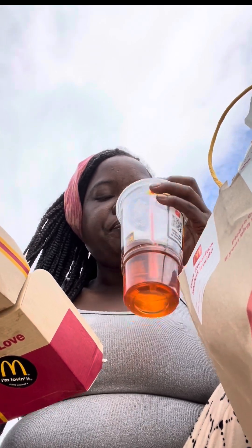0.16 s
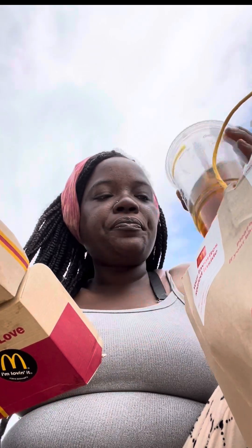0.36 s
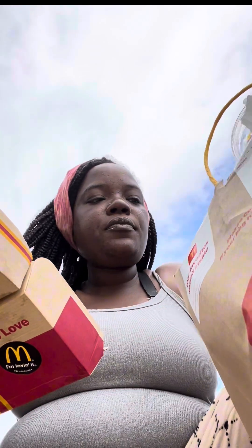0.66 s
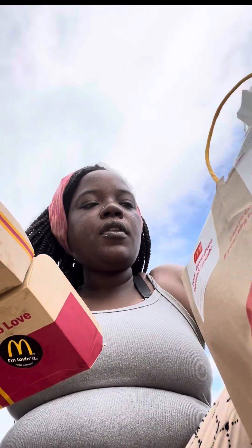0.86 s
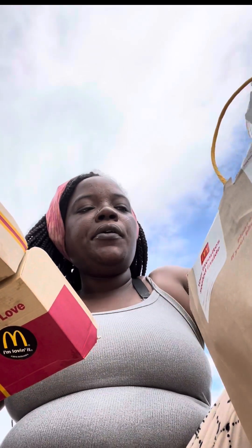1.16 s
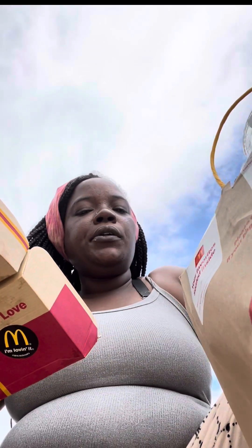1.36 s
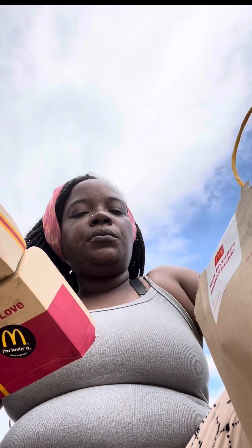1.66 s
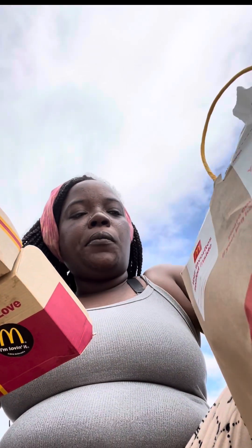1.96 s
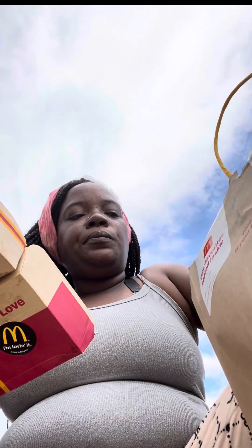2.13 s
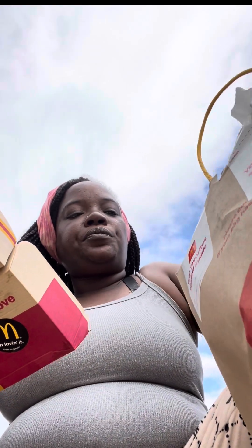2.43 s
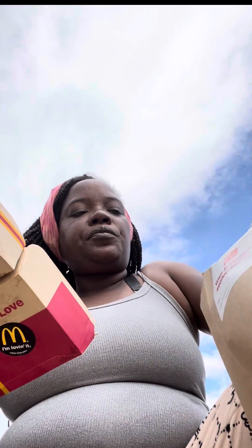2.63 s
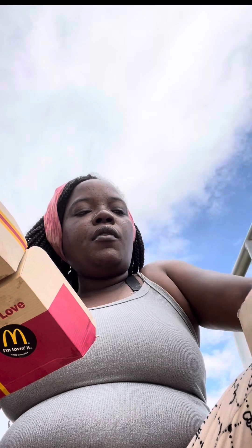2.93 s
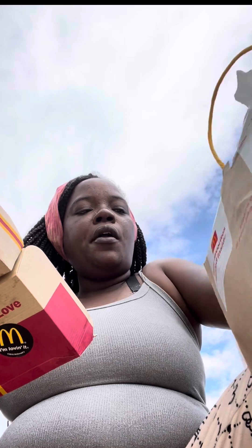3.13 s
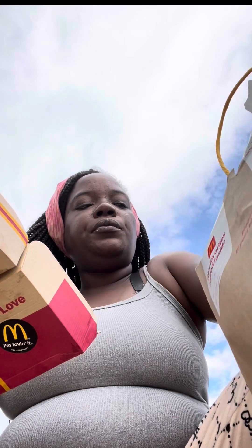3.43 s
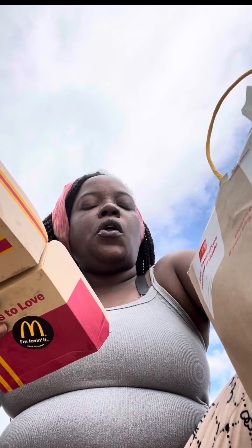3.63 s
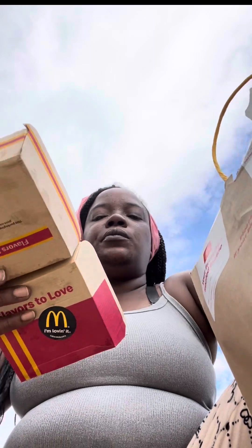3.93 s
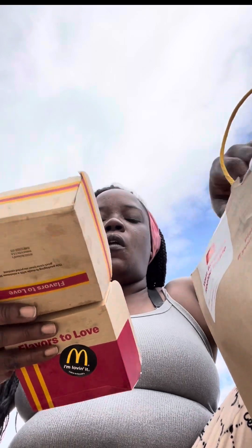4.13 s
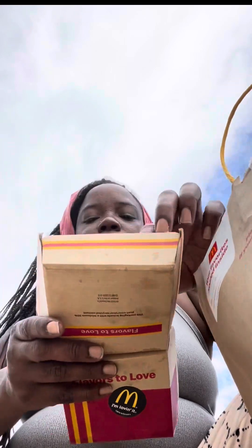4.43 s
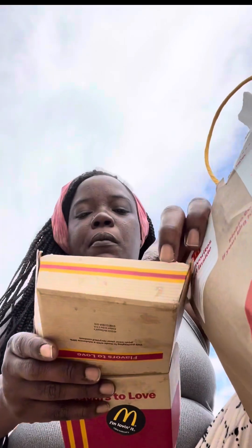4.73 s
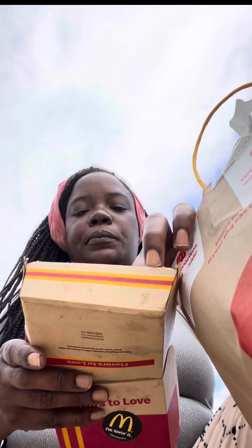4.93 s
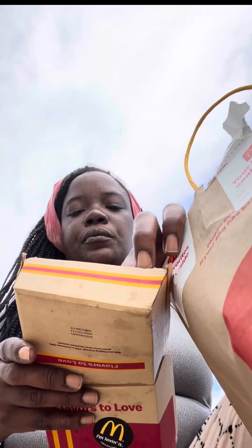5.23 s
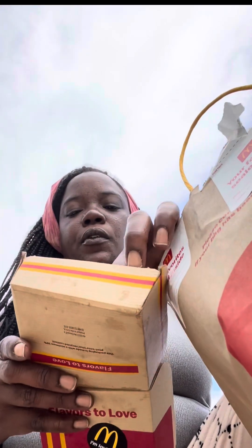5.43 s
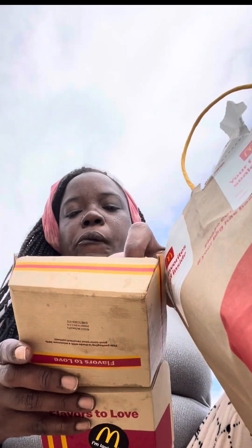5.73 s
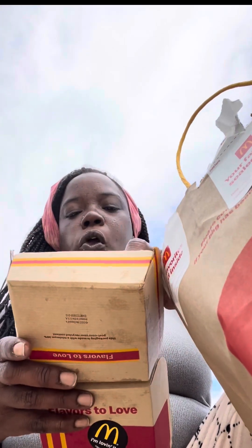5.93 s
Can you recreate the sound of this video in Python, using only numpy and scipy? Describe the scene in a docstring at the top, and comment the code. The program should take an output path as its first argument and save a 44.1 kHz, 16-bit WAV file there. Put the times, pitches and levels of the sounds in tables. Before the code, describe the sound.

Paper bag and thin cardboard box handled right beside the microphone, sharp snaps, crackles and dull thuds over low rumble and faint outdoor air.

```python
"""Paper bag and cardboard box beside a phone

Outdoors, paper and card buckle in sharp snaps: noise bursts drive resonances of air, panels and creases.
Decaying tones make panel rings and hard cracks; filtered pushes make taps; noise makes ticks, scrapes, rustle
and hiss. The phone itself gets thuds (swelling low sines), rumble (banded noise) and rocking (one low
resonance). An engine, a sum of crank harmonics, wavers, slows and fades in the first second over a faint noise
hush."""
import sys
import numpy as np
from scipy import signal
from scipy.io import wavfile
from scipy.ndimage import uniform_filter1d

SR = 44100
rng = np.random.default_rng(int(sys.argv[2]) if len(sys.argv) > 2 else 0)


def unload_audio(sound):
    """Save the sound as a 16-bit wav file, at the path given as the first command line argument."""
    columns = np.transpose(np.atleast_2d(sound))
    # keep every value between -1 and 1, then stretch to whole-number steps
    steps = np.round(np.clip(columns, -1, 1) * 32767)
    wavfile.write(sys.argv[1], SR, steps.astype(np.int16))


N = 268128
TIME = np.arange(N) / SR
CUTOFF_HZ = 15900

# Buckles of paper and card. Each row: start in seconds, relative strength in dB, sharpness in dB,
# decay time in seconds, panel pitch in Hz, crease pitch in Hz, ring in dB (half of it goes to the level),
# left over right in dB.
BUCKLES = [(0.698, -32, -20, 0.034, 534, 1680, -13, -9), (0.856, -28.5, -16, 0.057, 920, 1830, -5.5, -4),
           (1.599, -31.5, -7.5, 0.037, 498, 1750, -17, -5), (1.727, -27.5, 9.5, 0.009, 455, 2940, -3, 0),
           (1.733, -29.5, -12, 0.016, 680, 2260, -2, -9), (1.873, -33, -8, 0.0041, 473, 2720, -16, 2),
           (2.121, -30.5, 2, 0.017, 1180, 2620, 1, -6), (2.138, -27.5, -22, 0.0082, 566, 2690, -3, -5),
           (2.168, -21.5, 3, 0.0049, 1750, 2640, 2.5, 0), (2.178, -25, -1.5, 0.0026, 486, 2780, -19, -15),
           (2.197, -28.5, -15, 0.0068, 460, 2320, 6, -15), (2.2059, -20.5, 0.5, 0.0065, 960, 2450, -10, -9),
           (2.2132, -21, -6.5, 0.0063, 1040, 2800, -4, 2), (2.287, -45, 15.5, 0.025, 1030, 3260, 9, -3),
           (2.375, -21.5, -20.5, 0.006, 1080, 1680, -10, -6.5), (2.462, -31, 12, 0.015, 696, 2840, 1, -4),
           (2.488, -33, 9, 0.013, 2110, 2860, 11.5, 0), (2.502, -33.5, 9, 0.025, 1750, 2360, 12, -5),
           (2.5317, -32.5, 4, 0.006, 1370, 3200, -3, 2), (2.5467, -24, 1.5, 0.013, 586, 2820, -8, -4),
           (2.559, -34, 4, 0.0047, 594, 3170, 10, -2), (2.6624, -33.5, 13, 0.0068, 684, 2580, 3, -3),
           (2.68, -26, -7, 0.0041, 760, 2700, -12, -10), (2.709, -34.5, 4, 0.0058, 1400, 2360, -3, -10),
           (2.73, -25, -7, 0.011, 1410, 1520, -5, -7), (2.831, -31, -6, 0.0098, 493, 2640, 2, -6),
           (2.879, -29, 1.5, 0.0085, 540, 2320, 2, -4), (2.908, -28, -19, 0.019, 1160, 2730, -5, -8),
           (2.9342, -24, 1, 0.0021, 1110, 2780, 6.5, -3), (2.949, -21.5, -3, 0.0031, 1130, 2430, -9, 0),
           (2.977, -25, -10, 0.011, 920, 1690, -3.5, -11), (3.012, -24, 1, 0.015, 536, 2450, -10, -5),
           (3.0242, -21, -10, 0.0072, 680, 2700, -23, 3.5), (3.032, -23.5, -7, 0.016, 960, 1980, -0.5, -8),
           (3.098, -19.5, -4, 0.0082, 1045, 2740, -8, -5), (3.1063, -24.5, -15, 0.01, 530, 2750, -1, -2),
           (3.187, -29, -11, 0.016, 465, 1780, -4, -11), (3.449, -24, -13.5, 0.01, 850, 2650, -14, -8.5),
           (3.589, -30, 4, 0.065, 520, 2640, 1, -1), (3.633, -21, 2, 0.011, 1280, 3020, 0, -8),
           (3.821, -33.5, 14.5, 0.014, 2700, 2680, -13, 0),
           (4.037, -28.5, -15.5, 0.021, 840, 2450, -13, -9), (4.464, -34.5, -3, 0.019, 756, 1390, 5, 0),
           (4.541, -33.5, -8.5, 0.0036, 695, 2550, 6, 1), (4.602, -37.5, -8, 0.0048, 574, 1710, 10.5, 0),
           (4.696, -36, -15, 0.0045, 640, 1510, -1.5, 3), (4.948, -31.5, -23, 0.0027, 490, 2430, 4, 3),
           (4.997, -38, -27, 0.0058, 1150, 1720, 0, -7), (5.0655, -18.5, -0.5, 0.007, 1280, 2690, 1, -4),
           (5.162, -37, 6.5, 0.0049, 2780, 2800, -11, -3.5),
           (5.376, -36.5, -14, 0.0091, 810, 1630, -3.5, -4), (5.409, -44, 1, 0.0055, 870, 2580, 3, 0),
           (5.460, -32.5, 4.5, 0.011, 1230, 2210, 0, -1), (5.6253, -33.5, 2, 0.0042, 1280, 2400, 17, 5)]
# Rubbing and air on the phone. Each row: time in seconds, level in dB.
PHONE_RUBBING = [(0.0, -27.5), (0.25, -36.5), (0.93, -38), (1.79, -35.5), (2.56, -28.5), (3.0, -27.5),
                 (3.15, -25.5), (3.42, -28), (3.57, -25), (4.01, -27.5), (4.17, -29), (4.4, -32),
                 (4.5, -26.5), (4.67, -37), (5.57, -44.5), (6.08, -81)]


def from_db(db):
    """Level to amplitude: 20 dB is a factor of ten."""
    return 10 ** (np.asarray(db) / 20)


def rms_one(x):
    """Normalisation: scale to unit mean power."""
    return x / np.sqrt(np.mean(x ** 2) + 1e-20)


def in_time(rows):
    """Linear interpolation: each column of a curve at every sample."""
    seconds, *columns = np.transpose(rows)
    return [np.interp(TIME, seconds, column) for column in columns]


def at_hz(points, hz):
    """Pitch is logarithmic: interpolate a curve on a log-frequency axis."""
    curve_hz, values = np.transpose(points)
    return np.interp(np.log(hz), np.log(curve_hz), values)


def butter(x, hz, kind, order=2):
    """Causal Butterworth filter, flat within its passband."""
    return signal.sosfilt(signal.butter(order, hz, kind, fs=SR, output="sos"), x)


def peak(x, hz, width_hz):
    """A single resonance, with gain 1 at its centre."""
    return signal.lfilter(*signal.iirpeak(hz, hz / width_hz, fs=SR), x)


def drift(rate_hz):
    """Low-passed noise: a slow random wander of spread 1, computed at every 40th sample."""
    r = np.exp(-80 * np.pi * rate_hz / SR)
    noise = rng.standard_normal(N // 40 + 2002)
    slow = signal.lfilter([1], [1, -2 * r, r * r], noise)[2000:]  # skip the filter's start
    return np.interp(np.arange(N) / 40, np.arange(len(slow)), rms_one(slow))


def panned(pan_db):
    """Level difference between ports: left and right gains, positive towards the left."""
    return from_db(np.array([[.5], [-.5]]) * pan_db)


def pair(mid, side, alike):
    """Stereo correlation: two unrelated signals become a pair of given likeness."""
    return np.sqrt((1 + alike) / 2) * mid + np.sqrt((1 - alike) / 2) * side * np.array([[1], [-1]])


def resonate(x, modes, low_hz, high_hz, size=4096):
    """Modal filtering: parallel resonances, each with its own pan; white noise keeps its mid power."""
    click, response = signal.unit_impulse(size), 0
    for k, (hz, width_hz, db, pan_db) in enumerate(modes):
        r = np.exp(-np.pi * width_hz / SR)
        poles = [1, -2 * r * np.cos(2 * np.pi * hz / SR), r * r]
        mode = (1 - r * r) * signal.lfilter([1, 0, -1], poles, click)
        response = response + (-1) ** k * from_db(db) * panned(pan_db) * mode  # alternating signs
    response = butter(butter(response, low_hz, "high", order=3), high_hz, "low", order=5)
    return signal.oaconvolve(x, response / np.linalg.norm(response.mean(axis=0)), axes=1)[:, :N]


def packaging(hollow, sheet, crisp, hollow_width=0.44):
    """Coupled resonators: enclosed air booms, panels clack, creases tick; long waves reach both ports alike."""
    # Resonances of the air, the panels and the creases.
    # Each row: pitch in Hz, width in Hz, level in dB, left over right in dB.
    air_modes = [(267, 35.6, 4.5, 0.5), (455, 104, 3.5, -1.5), (750, 1400, -10, -10)]
    panel_modes = [(965, 203, 9, -2.5), (1083, 206, 7, -7.5), (1680, 830, -2.5, -3), (2290, 92, 5.5, 1.5),
                   (2780, 290, 2.5, 4.5), (3516, 1000, -7.5, 9)]
    crease_modes = [(4220, 490, -1.5, 0.87), (5650, 900, -3.5, 0.91), (6540, 570, -5, 0.9)]
    middle = hollow.mean(axis=0)
    hollow = middle + hollow_width * (hollow - middle)
    boom = resonate(hollow, air_modes, 190, 1165)
    clack = resonate(sheet, panel_modes, 1000, 4320)
    tick = resonate(crisp, crease_modes, 1200, 17000)
    return boom + clack + tick


def banded_noise(spectrum, top_hz, patchy_db):
    """Subband synthesis: half-octave noise bands, each with its own flicker and likeness; rms 1."""
    # Stereo likeness. Each row: frequency in Hz, left-right correlation.
    port_likeness = [(40, .998), (90, .995), (180, .98), (350, .8), (700, .5), (1500, .3), (5000, .3),
                     (12000, .8)]
    edges = 22 * 2 ** np.arange(0, 10, .5)
    out, white = 0, rng.standard_normal((2, 2, N))
    for k, (low, high) in enumerate(zip(edges, edges[1:])):
        if low < top_hz:
            hz = np.sqrt(low * high)
            band = pair(*butter(white[k % 2], [low, high], "band"), at_hz(port_likeness, hz))
            out = out + band * from_db(at_hz(spectrum, hz) + patchy_db * drift(16.6))
    return rms_one(out)


def facets(x, count=4):
    """Random resonance: every buckle bends other facets, which give it a colour of its own."""
    pitches = 700 * 2 ** (3 * (np.arange(count) + rng.random(count)) / count)
    return x + sum(peak(x, hz, hz / 12) for hz in pitches)


def snaps(hollow_db=-1, sheet_db=-3.0, crisp_db=-14, crease_width_hz=220, grain_db=7, rise_s=0.0005,
          tail_db=-14, hollow_tail_s=0.029, sheet_tail_s=0.013, crisp_tail_s=0.0065, size=6000):
    """Buckling: a crease yields in a quick run of tiny buckles and rings; hollow tails last longest."""
    hollow_loss, sheet_gain = 0.16, 0.55  # dB per dB of sharpness: sharp buckles boom less and crack more
    t = TIME[:size]
    tail_s = np.array([hollow_tail_s, sheet_tail_s, crisp_tail_s])[:, None, None]
    tails = from_db(tail_db) * np.exp(-t / tail_s)
    drive, creases = np.zeros((3, 2, N + size)), np.zeros((2, N + size))
    for s, db, sharp_db, decay_s, _, crease_hz, ring_db, pan_db in BUCKLES:
        hollow, sheet, crisp = db - hollow_loss * sharp_db, db + sheet_gain * sharp_db, db + sharp_db
        # each grain holds one random level for 24 samples
        steps = np.repeat(rng.standard_normal(size), 24)[:size].clip(-1.5, 1.5)
        fade = (np.exp(-(t / decay_s) ** 2) + tails) * (1 - np.exp(-t / rise_s))
        run = facets(pair(*rng.standard_normal((2, size)), .4) * from_db(grain_db * steps) * fade)
        run *= np.sqrt(.01 * SR / np.sum(run ** 2, axis=2, keepdims=True))  # equal energy
        burst = from_db([hollow + hollow_db, sheet + sheet_db, crisp + crisp_db])[:, None, None] * run
        ring = peak(run[2], crease_hz, crease_width_hz)
        ring *= np.sqrt(.002 * SR / np.sum(ring ** 2, axis=1, keepdims=True))
        at = int(s * SR)
        drive[:, :, at:at + size] += burst * panned(pan_db)
        creases[:, at:at + size] += from_db(sheet + ring_db / 2) * panned(pan_db) * ring
    return packaging(*drive[:, :, :N]) + creases[:, :N]


def panels(level_db=11, ring_s=0.0024, rise_s=0.00056, overtone=1.744, overtone_db=-9,
           port_lag_s=.00008, size=2500):
    """Free plate vibration: a flipped panel rings at a pitch set by its size; the right port hears it first."""
    ring_loss = 0.14  # dB per dB of sharpness
    ring_length_gain = 0.28  # a louder ring is also longer: dB of time per dB
    panel_pan_db = -2.5  # the flat panels face further right than the creases
    t = np.maximum(TIME[:size] - port_lag_s * np.array([[1], [0]]), 0)
    out = np.zeros((2, N + size))
    for s, db, sharp_db, _, hz, _, ring_db, pan_db in BUCKLES:
        phase = 2 * np.pi * hz * t
        ring = np.sin(phase) + from_db(overtone_db) * np.sin(overtone * phase)
        decay_s = ring_s * from_db(ring_length_gain * ring_db)
        fade = np.exp(-t / decay_s) * (1 - np.exp(-t / rise_s))
        gain = from_db(db - ring_loss * sharp_db + ring_db / 2 + level_db)
        at = int(s * SR)
        out[:, at:at + size] += gain * panned(pan_db + panel_pan_db) * ring * fade
    return out[:, :N]


def cracks(rise_s=0.00031, sag=0.021, pan_db=-2, port_lag_s=.00004, size=2500):
    """Snap-through: a stiff fold pops and rings at two pitches, which sag as the tension lets go."""
    # Each row: start in seconds, level of the lower tone in dB, lower pitch in Hz, upper pitch in Hz,
    # upper over lower tone in dB, decay time in seconds. The pitches are those after the sag.
    popped_folds = [(1.7278, -18, 3060, 3990, 6, 0.002), (2.1685, -23, 1720, 4900, -5, 0.0033),
                    (2.2065, -13, 1750, 4900, -15, .003), (2.7305, -17.5, 1390, 2320, -6, .003),
                    (2.9348, -24.5, 1150, 4140, 8, 0.0029), (2.9495, -16, 2370, 4300, -10, .003),
                    (3.635, -34, 2170, 2780, -3, 0.0036), (5.0662, -8.5, 1720, 3600, -6, 0.002),
                    (5.0675, -13.5, 2055, 2680, 5.5, 0.0028)]
    t = np.maximum(TIME[:size] - port_lag_s * np.array([[1], [0]]), 0)  # the right port hears it first
    out = np.zeros((2, N + size))
    for s, peak_db, lower_hz, upper_hz, upper_db, decay_s in popped_folds:
        fade = np.exp(-t / decay_s)
        turn = 2 * np.pi * (t + sag * decay_s * (1 - fade))
        ring = np.sin(lower_hz * turn) + from_db(upper_db) * np.sin(upper_hz * turn)
        at = int(s * SR)
        out[:, at:at + size] += from_db(peak_db) * ring * fade * (1 - np.exp(-t / rise_s))
    return panned(pan_db) * out[:, :N]


def bumps(low_hz=170, boom_hz=300, boom_width_hz=60, pan_db=-3, size=3000):
    """Impulse response: a fingertip gives the box wall one rounded push, and the air inside booms briefly."""
    # Each row: start in seconds, peak level before panning in dB, upper cutoff of the push in Hz.
    finger_taps = [(.44, -22, 330), (1.729, -41, 790), (1.743, -25, 600), (2.157, -21, 550),
                   (2.184, -14.5, 600), (2.198, -11, 540), (2.2141, -13, 676), (2.377, -20.5, 705),
                   (2.389, -19.5, 590), (2.682, -24, 600), (3.636, -5.5, 800), (4.038, -24, 1000),
                   (4.052, -16.5, 780), (4.148, -18, 450), (4.163, -21, 680), (4.245, -16.5, 750),
                   (4.267, -16.5, 550), (4.284, -19.5, 394), (4.952, -21.5, 1320), (5.066, -21, 814),
                   (5.078, -22, 720), (5.626, -25, 400), (5.642, -22, 450)]
    out = np.zeros(N + size)
    for s, peak_db, top_hz in finger_taps:
        push = butter(butter(signal.unit_impulse(size), top_hz, "low", order=4), low_hz, "high")
        knock = push + peak(push, boom_hz, boom_width_hz)
        at = int(s * SR)
        out[at:at + size] += from_db(peak_db) * knock / np.abs(knock).max()
    return panned(pan_db) * out[:N]


def ticks(level_db=-6, low_hz=5500, size=1500):
    """Small radiators favour short waves: the smallest creases click with treble only."""
    # Each row: start in seconds, relative level in dB.
    small_creases = [(1, -27.5), (2.0976, -30.5), (2.206, -22), (2.464, -28), (2.933, -15.5), (3.028, -28),
                     (3.594, -24), (3.825, -23), (4.4825, -27), (5.163, -34)]
    out = np.zeros((2, N + size))
    fade = np.exp(-TIME[:size] / .003)
    for s, peak_db in small_creases:
        at = int(s * SR)
        click = pair(*rng.standard_normal((2, size)), 0.096) * fade
        out[:, at:at + size] += from_db(peak_db + level_db) * click
    return butter(out[:, :N], low_hz, "high")


def scrape(slips_per_s=2500, grain_db=3):
    """Stick-slip friction: card fibres catch and slip so densely that the flap sounds one fine, unbroken rub."""
    # Card scraping along card. Each row: time in seconds, relative level in dB.
    scrape_curve = [(4.42, -74), (4.465, -41.5), (4.52, -45), (4.548, -35.5), (4.578, -35), (4.611, -48),
                    (4.679, -63)]
    # Resonances of the flap. Each row: pitch in Hz, width in Hz, level in dB, left over right in dB.
    flap_modes = [(680, 330, -0.5, 4), (1324, 330, 2, 1), (1720, 190, 1.5, -1), (2700, 1200, -13, -3)]
    slips = (rng.random(N) < slips_per_s / SR) * from_db(grain_db * rng.standard_normal(N))
    rub = rms_one(slips * rng.choice([-1, 1], N))
    s, db = np.transpose(scrape_curve)
    rub = rub * np.interp(TIME, s, from_db(db), left=0, right=0)
    return resonate(np.ones((2, 1)) * rub, flap_modes, 350, 5000)


def stroking():
    """Power addition: strokes swell, hold and die away above the stir of holding; rustle and hiss gains."""
    # A hand slides over the packaging. Each row: start in seconds, length in seconds,
    # relative rustle level in dB, relative fine hiss level in dB.
    hand_strokes = [(0.443, 0.078, -45.5, -72), (0.905, 0.082, -44, -59.5), (1.212, 0.1, -48.5, -69),
                    (1.427, 0.11, -43, -65.5), (1.652, 0.37, -48.5, -72.5), (2.063, 0.16, -39, -64.5),
                    (2.32, 0.038, -35.5, -71), (2.46, 0.14, -35.5, -57), (2.625, 0.13, -34, -58.5),
                    (2.799, 0.31, -37, -64.5), (3.136, 0.37, -47, -77), (3.55, 0.13, -36.5, -64),
                    (3.773, 0.11, -43.5, -71), (3.919, 0.05, -44.5, -63), (4.466, 0.11, -50, -64.5),
                    (5.45, 0.19, -49, -61), (5.486, 0.018, -39, -62), (5.595, 0.056, -39.5, -57),
                    (5.738, 0.28, -52, -68.5)]
    attack_s, release_s = 0.024, 0.045
    # the packaging stirs a little even when only held
    rustle_power, hiss_power = from_db(-51) ** 2, from_db(-96.5) ** 2
    for s, length_s, rustle_db, hiss_db in hand_strokes:
        swell = np.clip((TIME - s) / attack_s, 0, 1)
        shape = swell * np.exp(-np.maximum(TIME - s - length_s, 0) / release_s)
        rustle_power = rustle_power + (from_db(rustle_db) * shape) ** 2
        hiss_power = hiss_power + (from_db(hiss_db) * shape) ** 2
    return np.sqrt(rustle_power), np.sqrt(hiss_power)


def crinkles(level_db, per_s=380, grain_db=6, ring_periods=3.5, tilt_db=-9, count=18):
    """Clumped random impulses: small paper facets flip, each ringing a few cycles at one of 18 pitches."""
    born = rng.random(N) < per_s * from_db(5 * drift(20)) / SR
    strength = from_db(grain_db * np.minimum(rng.exponential(1, N), 2))
    flips = born * strength * pair(*rng.choice([-1, 1], (2, N)), 0.026)
    dealt, out = rng.integers(0, count, N), 0
    for k, hz in enumerate(np.geomspace(750, 5000, count)):
        r, w = np.exp(-hz / (ring_periods * SR)), 2 * np.pi * hz / SR
        gain = from_db(tilt_db * max(np.log2(hz / 2400), 0))  # the smallest facets radiate least
        poles = [1, -2 * r * np.cos(w), r * r]
        # the tiny offset keeps the filter state away from denormal numbers
        out = out + gain * signal.lfilter([0, np.sin(w)], poles, flips * (dealt == k) + 1e-18)
    return from_db(level_db) * rms_one(butter(out, [400, 6500], "band"))


def rustle(sliding, sheet_db=-6, hollow_db=-3, crisp_db=-14, crinkle_db=1, stick_db=2.0, pan_db=-3.0,
           quiet_db=-50):
    """Friction noise: sliding paper gives an uneven rub with small crinkles riding on it."""
    level_db = 20 * np.log10(sliding)
    # the air inside is stirred by the stroke or by rubbing on the phone, whichever is stronger
    body_db = np.maximum(level_db + 3, in_time(PHONE_RUBBING)[0] - 11)
    moving = panned(pan_db) / (1 + from_db(2 * (quiet_db - level_db)))  # barely moving paper is held back
    rub = pair(*rng.standard_normal((2, N)), 0.047) * from_db(stick_db * drift(130))
    rub = rms_one(rub) * moving
    hollow = rub * from_db(body_db + hollow_db)
    sheet = rub * from_db(level_db + sheet_db)
    crisp = rub * from_db(level_db + crisp_db)
    return packaging(hollow, sheet, crisp) + moving * crinkles(level_db + crinkle_db)


def swish(pressure, level_db=11, low_hz=2400, top_hz=6000):
    """Fine-scale friction: skin gliding on a smooth surface gives a grainy hiss."""
    grain = from_db(2 * drift(30) + 4 * drift(200))
    noise = pair(*rng.standard_normal((2, N)), 0.045) * grain
    hiss = rms_one(butter(noise, [low_hz, top_hz], "band", order=1))
    return hiss * pressure * from_db(level_db)


def nearby_echoes(x, level_db=-19, decay_s=0.01, dull_hz=1800, size=5000):
    """Diffuse reflection: short dull scatter from the body, the bag and the ground."""
    t = TIME[:size]
    scatter = butter(rng.standard_normal((2, size)), dull_hz, "low")
    scatter = scatter * np.exp(-t / decay_s) * (t > .003)
    scatter /= np.linalg.norm(scatter, axis=1, keepdims=True)
    return x + from_db(level_db) * signal.oaconvolve(x, scatter, axes=1)[:, :N]


def thuds(level_db=-2.5, rise_s=0.0089, overtone_db=-9, overtone=2.16, contact_db=-8, contact_hz=420):
    """Damped mass on a spring: a padded knock rocks the phone a few cycles; the contact adds a dull pat."""
    # Soft knocks that reach the phone. Each row: start in seconds, relative level in dB, pitch in Hz.
    soft_knocks = [(0.816, -15.5, 147), (0.821, -15.5, 77), (1.101, -24.5, 111.6), (1.15, -20.5, 74),
                   (1.876, -20, 74.3), (2.192, -10.5, 136), (2.212, -14, 64), (2.377, -17, 191),
                   (2.573, -17, 112), (2.682, -10, 102), (2.988, -14, 120), (3.025, -13.5, 190),
                   (3.41, -10.5, 56), (3.452, -11.5, 67), (3.643, -5.5, 83.5), (3.98, -8, 82.3),
                   (4.04, -10.5, 78.3), (4.108, -14, 81), (4.155, -14.5, 79), (4.234, -9, 108),
                   (4.263, -8, 66.6), (4.294, -9.5, 82.4), (4.481, -14.5, 80), (4.709, -20.5, 90),
                   (4.876, -21.5, 78), (4.954, -16, 76), (5.055, -18, 98), (5.625, -18, 98.2)]
    out, touches = np.zeros(N), np.zeros(N)
    for s, peak_db, hz in soft_knocks:
        at = int(s * SR)
        t = TIME[:min(N - at, SR // 5)]
        swell = t / rise_s * np.exp(1 - t / rise_s)
        upper = from_db(overtone_db) * swell * np.sin(2 * np.pi * overtone * hz * t)
        sway = np.sin(2 * np.pi * hz * t) + upper
        out[at:at + len(t)] += from_db(peak_db + level_db) * swell * sway
        touches[at:at + len(t)] += from_db(peak_db + contact_db) * swell ** 2 * rng.standard_normal(len(t))
    return out + butter(touches, [contact_hz / 2, contact_hz], "band")


def rumble():
    """Low-frequency random excitation: lumpy noise from rubbing and moving air."""
    # Each row: frequency in Hz, relative spectral density in dB per Hz.
    low_colour = [(15, -42), (25, -35), (47, -5), (86, 0), (113, -9.5), (163, 0), (200, -7), (264, -24),
                  (333, -24.5), (450, -25), (580, -54), (990, -120)]
    return from_db(in_time(PHONE_RUBBING)[0]) * banded_noise(low_colour, top_hz=450, patchy_db=3.0)


def rocking(level_db=-3, hz=86, width_hz=7, firm_db=-25, steepness=2.17):
    """Resonance under random force: firm rubbing sets the propped phone rocking at its own low pitch."""
    sway = rms_one(peak(rng.standard_normal(N), hz, width_hz))
    even = sway / np.sqrt(uniform_filter1d(sway ** 2, SR // 8) + .1)  # evens out the random swelling
    firmness_db = steepness * (in_time(PHONE_RUBBING)[0] - firm_db)
    return from_db(firm_db + level_db + firmness_db) * even


def engine(waver_db=0.8):
    """Harmonic synthesis: only low orders of the exhaust carry this far; the air makes each swell and fade."""
    # Each row: time in seconds, crank turns per second, level in dB.
    engine_run = [(0, 47, -44.5), (.12, 48.4, -36.5), (.3, 44.7, -34), (.45, 45.3, -37.5),
                  (.56, 41.3, -34.5), (.72, 42.5, -37.5), (.85, 46, -43), (1.0, 27, -60)]
    # Each row: multiple of the crank rate, relative level in dB.
    exhaust_orders = [(2, -7), (3, -3), (4, 3), (5, -9.5), (6, -28.5)]
    turns, level_db = in_time(engine_run)
    crank = 2 * np.pi * np.cumsum(turns) / SR
    tones = 0
    for order, db in exhaust_orders:
        fading_db = waver_db * drift(4)
        tones = tones + from_db(db + fading_db) * np.sin(order * crank + 2 * np.pi * rng.random())
    return np.sqrt(2) * from_db(level_db) * tones


def hush(level_db=-42, swell_db=1.5, edge_hz=3090, step_db=-5.5):
    """Coloured noise: faint outdoor air with gently swelling bright bands and a sharp drop above one pitch."""
    # Each row: frequency in Hz, relative spectral density in dB per Hz.
    air_colour = [(25, -7), (88, 2.5), (220, -5), (320, -9.5), (940, -13.5), (1800, -16), (2830, -16.5),
                  (3800, -29), (5450, -24), (7500, -63.5), (11000, -34.5), (16000, -79.5)]
    # Bright bands. Each row: pitch in Hz, width in Hz, gain in dB.
    bright_bands = [(1750, 550, -5), (2880, 130, -4)]
    air = banded_noise(air_colour, top_hz=CUTOFF_HZ, patchy_db=2.0)
    air = air + sum(from_db(db + swell_db * drift(2.3)) * peak(air, hz, width_hz)
                    for hz, width_hz, db in bright_bands)
    below, above = (signal.sosfilt(signal.ellip(7, .5, 50, edge_hz, kind, fs=SR, output="sos"), air)
                    for kind in ("low", "high"))
    return from_db(level_db) * (below + from_db(step_db) * above)


def scene():
    """Superposition: packaging close by, thuds and rumble on the phone, the outdoors behind."""
    sliding, gliding = stroking()
    buckling = snaps() + panels() + cracks()
    contacts = bumps() + ticks() + scrape()
    handling = buckling + contacts + rustle(sliding) + swish(gliding)
    on_phone = thuds() + rumble() + rocking()
    return nearby_echoes(handling) + on_phone + engine() + hush()


def record(dry, apart_db=7, apart_hz=9300, apart_q=3.8, side_top_hz=11000):
    """Mid-side filtering: near 9 kHz the two ports oppose; above, they agree and roll off; the top is cut."""
    mid, side = (dry[0] + dry[1]) / 2, (dry[0] - dry[1]) / 2
    mid = signal.lfilter(*signal.iirnotch(8900, 4, fs=SR), mid)
    mid = butter(mid, 13000, "low")
    side = side + (from_db(apart_db) - 1) * peak(side, apart_hz, apart_hz / apart_q)
    side = butter(side, side_top_hz, "low", order=6)
    top_cut = signal.ellip(10, .1, 90, CUTOFF_HZ, fs=SR, output="sos")
    return signal.sosfilt(top_cut, [mid + side, mid - side])


dry = scene()
out = record(dry)
unload_audio(out)
```